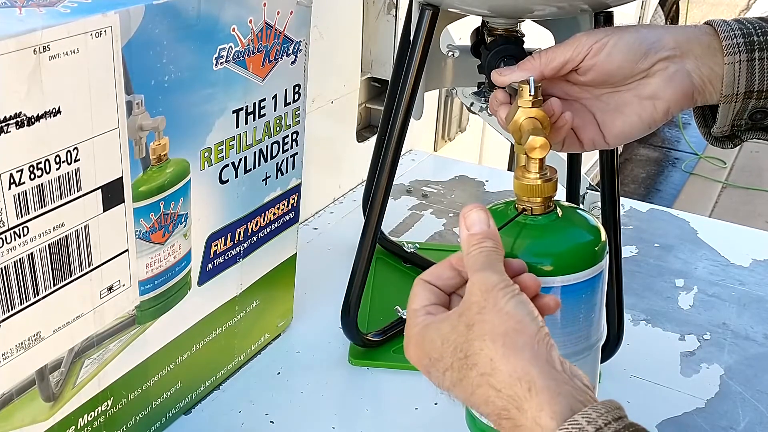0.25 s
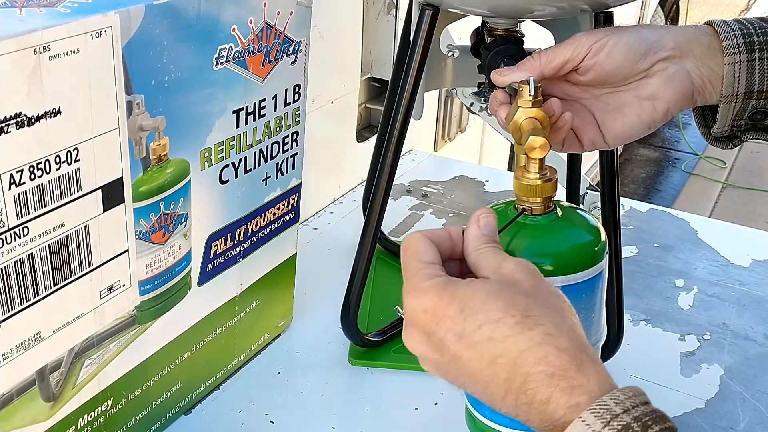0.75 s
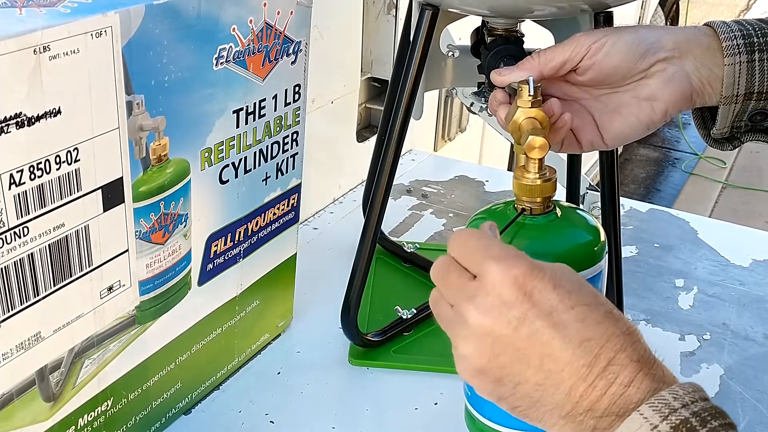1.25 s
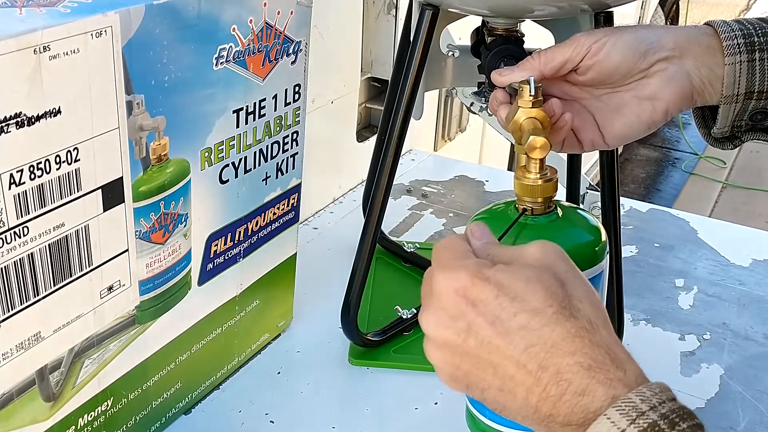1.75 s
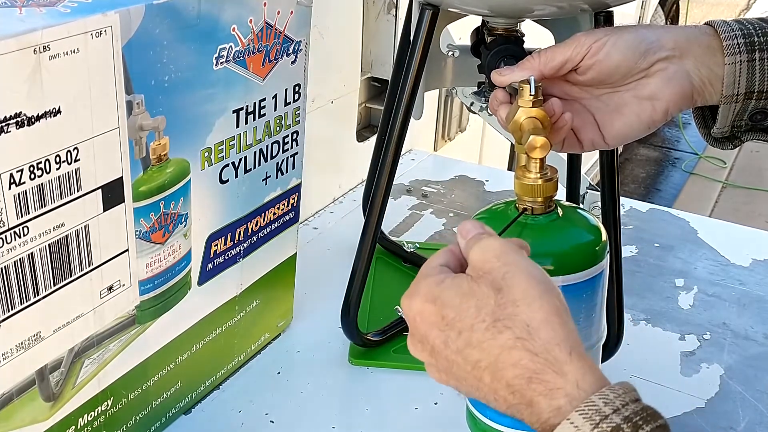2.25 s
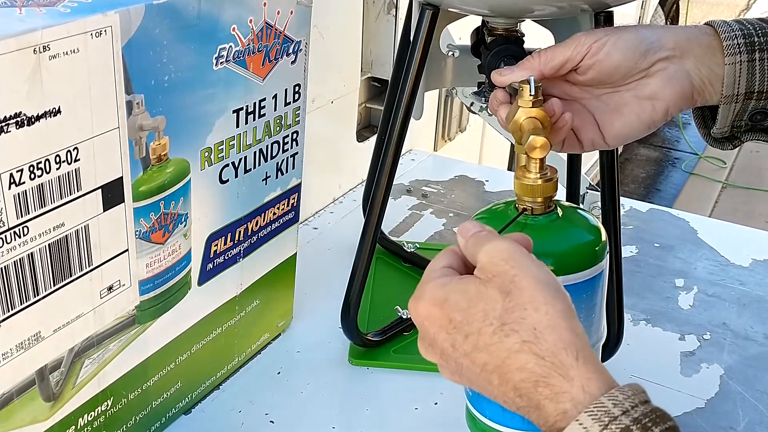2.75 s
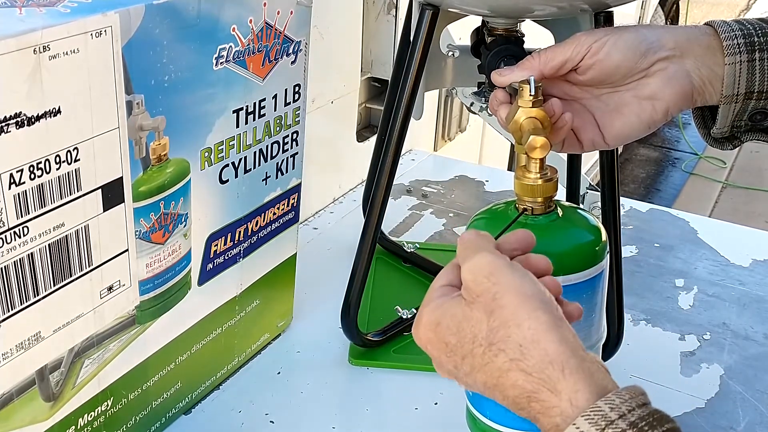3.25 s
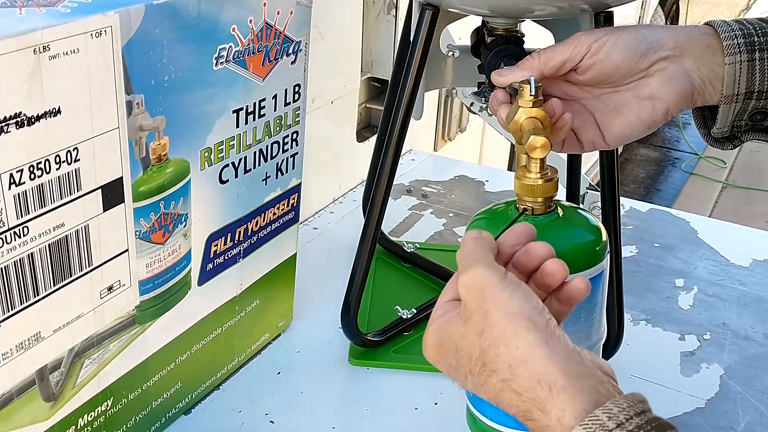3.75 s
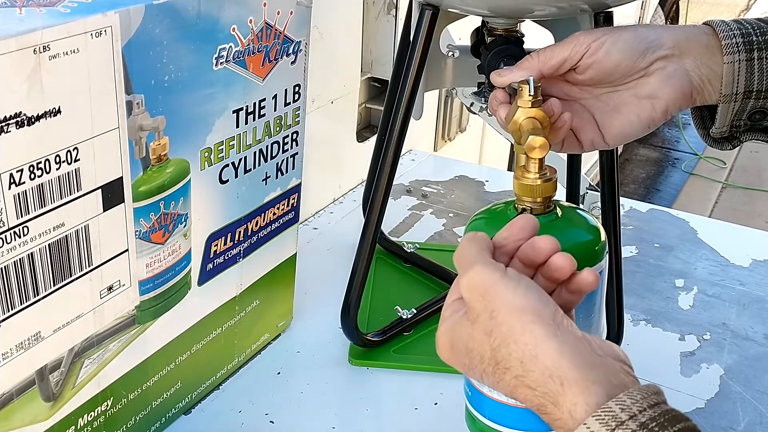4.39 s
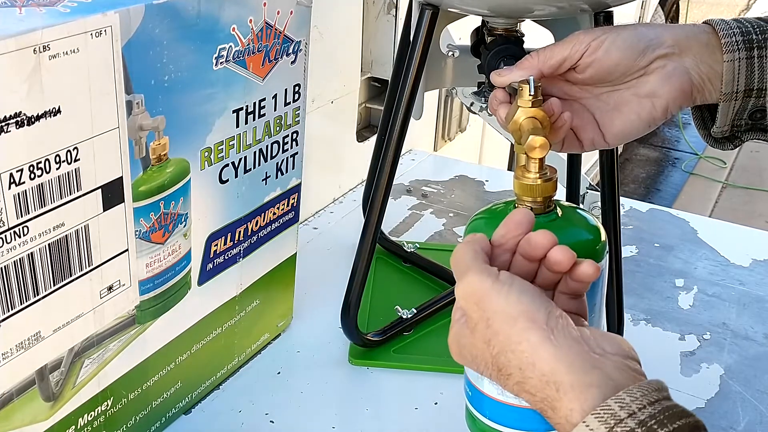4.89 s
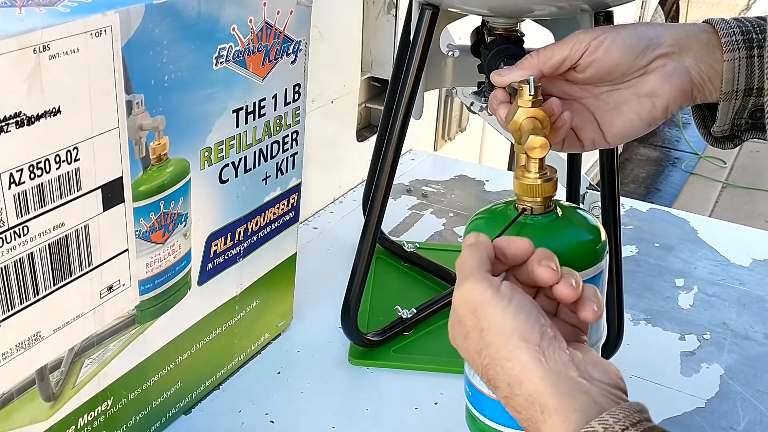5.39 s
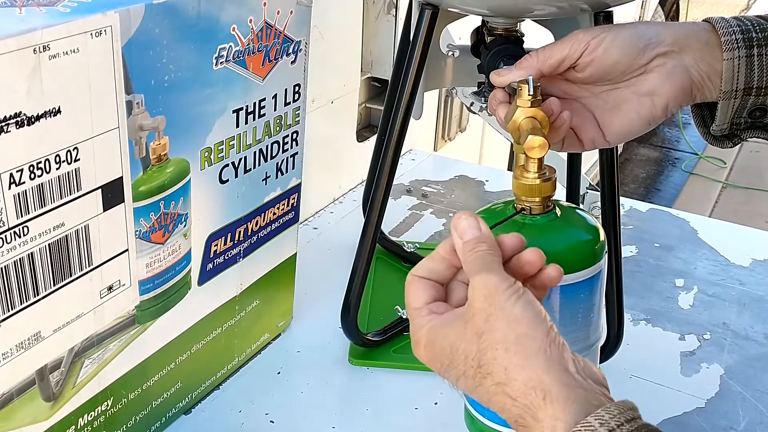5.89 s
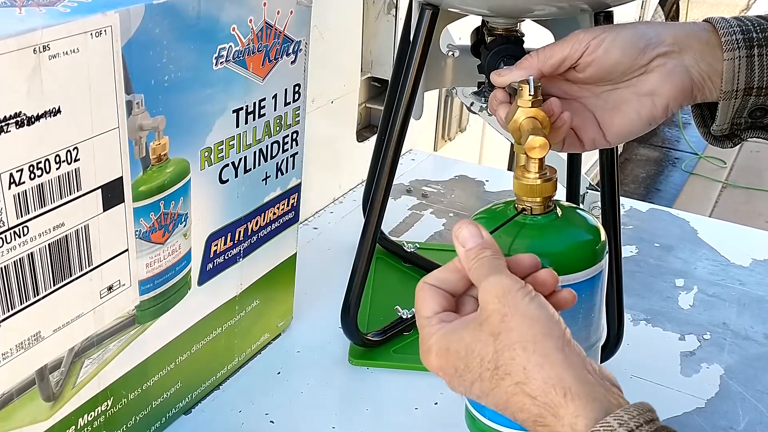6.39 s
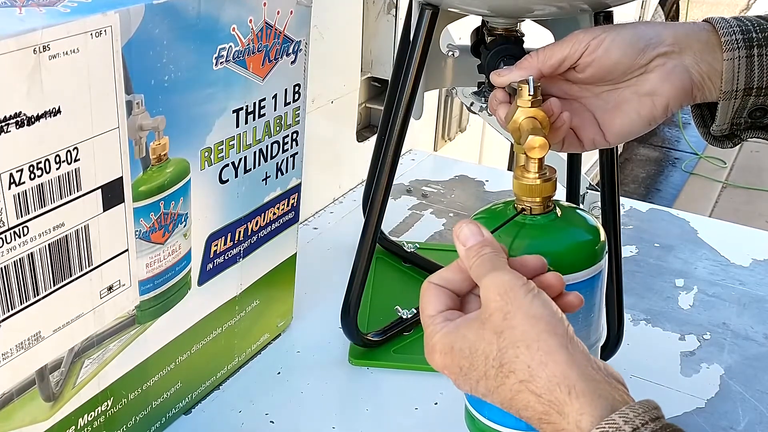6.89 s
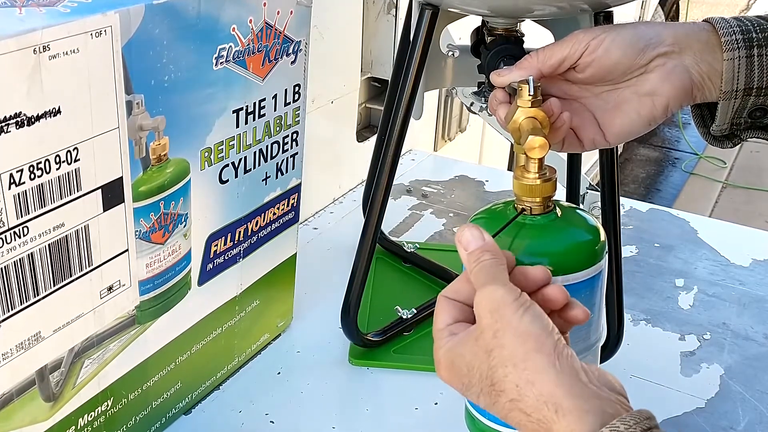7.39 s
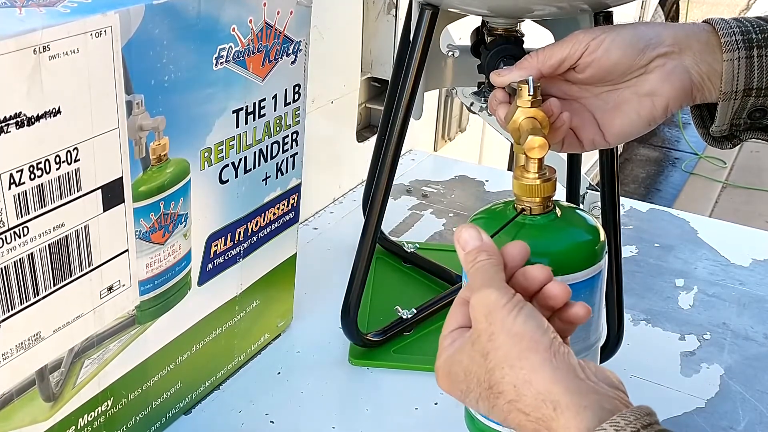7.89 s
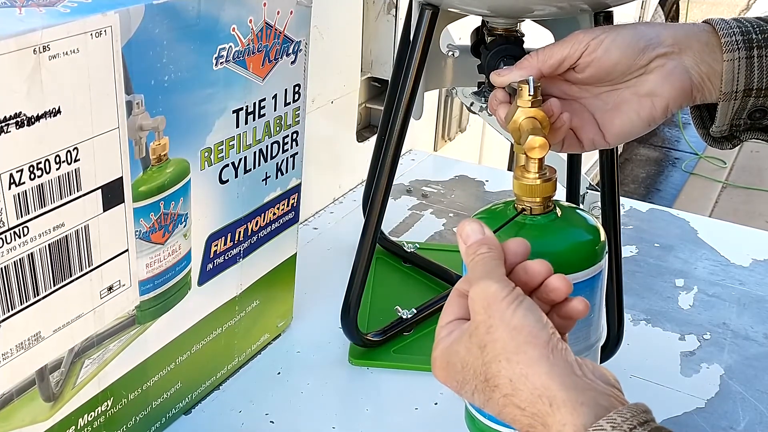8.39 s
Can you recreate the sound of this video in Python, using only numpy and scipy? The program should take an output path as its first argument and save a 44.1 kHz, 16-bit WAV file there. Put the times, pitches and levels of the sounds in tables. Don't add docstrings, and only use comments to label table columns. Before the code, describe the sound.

Gas jets sharply from a small bleed screw, dies away, returns by degrees from about two seconds, and hisses on steadily, sputtering briefly near the end.

```python
import sys
import numpy as np
from scipy import signal
from scipy.fft import rfft, irfft
from scipy.io import wavfile
from scipy.ndimage import uniform_filter1d

SR = 44100
rng = np.random.default_rng(int(sys.argv[2]) if len(sys.argv) > 2 else 0)


def makeup_ratio(level_db):
    decades = np.asarray(level_db, float) / 20
    return 10 ** decades


def materialize(psi):
    bounded = np.clip(np.atleast_2d(psi).T, -1, 1)
    quanta = np.round(bounded * 32767).astype(np.int16)
    wavfile.write(sys.argv[1], SR, quanta)


N = 381024
TIME_S = np.arange(N) / SR
HZ = np.fft.rfftfreq(N, 1 / SR) + 1e-3

# start_s, level_db
SCREW_FLOW = [(0, -20.5), (.53, -21), (.58, -22.5), (.628, -32.5), (.75, -42.5), (.776, -46.5), (.796, -90),
              (1.815, -88.5), (1.875, -57), (1.95, -48.5), (2.39, -28.5), (2.48, -26), (3.0, -26),
              (3.23, -23.5), (4.45, -20.5), (5.25, -21), (5.69, -19.5), (8.64, -20)]


def bleed():
    jet_db = along(SCREW_FLOW)
    surge_db = 1.7 * sum(gate for gate, _ in spit_gates())
    unsteady_db = 0.55 * walk(6) + 0.27 * walk(40) + surge_db
    hiss = makeup_ratio(jet_db) * (jet(jet_db) + whistle(jet_db))
    return makeup_ratio(unsteady_db) * (hiss + roar(jet_db) + boom(jet_db))


# freq_hz, density_db_per_hz
OPEN_JET = [(1760, -50), (3000, -26), (3590, -17), (3800, -11), (4500, -6), (5300, -6), (6200, -3),
            (7500, 0), (9000, .5), (10500, -3.5), (12000, -5.5), (13500, -4), (15650, -3), (17000, -3)]
# freq_hz, density_db_per_hz
PINCHED_JET = [(2000, -40), (3550, -26), (3900, -14), (4500, -15), (5500, -9), (6200, -5), (6950, 0),
               (7400, -4), (9000, -3), (11000, -6), (12200, -9), (13400, -5), (15400, -4), (17000, -4)]


def jet(jet_db):
    shut_db, open_db = -40, -22
    opened = np.clip((jet_db - shut_db) / (open_db - shut_db), 0, 1)
    wide = np.sqrt(opened) * heard(OPEN_JET, 0.14, 8.7, count=5)
    pinched = np.sqrt(1 - opened) * heard(PINCHED_JET, 0.89, 6.2, count=5)
    return wide + pinched


# freq_hz, density_db_per_hz
BORE_BAND = [(6300, -32), (6700, -8.5), (6950, 1.5), (7200, 0.5), (7500, -29)]


def whistle(jet_db):
    level_db, falter_at_db, falter_width_db, falter_depth_db = -11, -27, 3, 7
    filling_s, filling_db_per_s = 3.6, 3
    falter_db = falter_depth_db * np.exp(-((jet_db - falter_at_db) / falter_width_db) ** 2)
    fade_db = filling_db_per_s * np.maximum(TIME_S - filling_s, 0)
    return makeup_ratio(level_db - falter_db - fade_db) * heard(BORE_BAND, 1.2, 8, count=2, rings=[])


# freq_hz, density_db_per_hz
THROAT_COLOUR = [(710, -52), (1200, -17), (1920, -10), (2300, -10), (2810, -7), (3600, -6), (4000, 1.5),
                 (5200, -37.5), (8800, -120)]
# full_flow_db, slope_db_per_jet_db
ROAR_GROWTH = [
    (-40.5, 2.5),
    (-62, .38),
]


def roar(jet_db):
    return with_flow(jet_db, ROAR_GROWTH, full_db=-21.5) * heard(THROAT_COLOUR, 0.8, 6.9, count=3)


# full_flow_db, slope_db_per_jet_db
BOOM_GROWTH = [
    (-50.8, 4),
    (-76.5, .28),
]
# freq_hz, density_db_per_hz
STEEL_COLOUR = [(65, -44), (110, -3), (183, -11), (237, -2), (351, -9.5), (531, -1.5), (867, -9),
                (1020, -4.5), (1400, -12), (1820, -38), (3080, -120)]
BOOM_FULL_DB = -20.5


def boom(jet_db):
    return with_flow(jet_db, BOOM_GROWTH, BOOM_FULL_DB) * heard(STEEL_COLOUR, 0.81, 7.2, count=4)


# start_s, length_s, level_db
LIQUID_SPITS = [
    (7.588, .058, -29.5),
    (8.616, .05, -32),
]


def spit_gates():
    gates = []
    for start_s, length_s, level_db in LIQUID_SPITS:
        inside_s = np.minimum(TIME_S - start_s, start_s + length_s - TIME_S)
        gates.append((np.clip(inside_s / 0.003, 0, 1), level_db))
    return gates


# freq_hz, density_db_per_hz
SPIT_COLOUR = [(120, -28), (250, -6), (1000, -9), (3000, -4), (6000, 0), (10000, -5), (15700, -10)]


def spits():
    gate = sum(makeup_ratio(level_db) * gate for gate, level_db in spit_gates())
    return gate * makeup_ratio(2 * walk(150)) * heard(SPIT_COLOUR, 1.5, 60, count=3, rings=[])


# freq_hz, density_db_per_hz
VALVE_COLOUR = [(590, -29), (1000, -8.5), (1450, -10), (2240, -6.5), (3020, -13), (3800, -8), (5080, -13),
                (7260, -10), (9500, -13), (11000, -17), (15400, -17), (17000, -17)]


def fill_valve():
    start_s, rise_s, hold_s = 0.8, 0.15, 0.17
    level_db, boom_db, fade_db_per_s = -67.3, -7.6, 27.5
    since_s = TIME_S - start_s
    fade_db = fade_db_per_s * np.maximum(since_s - hold_s, 0)
    hiss = heard(VALVE_COLOUR, 0.8, 11, count=4)
    steel = makeup_ratio(boom_db) * heard(STEEL_COLOUR, 0.8, 8, count=3)
    return np.clip(1 + since_s / rise_s, 0, 1) * makeup_ratio(level_db - fade_db) * (hiss + steel)


# freq_hz, density_db_per_hz
TRAFFIC_COLOUR = [(18, -44), (30, -22), (45, -10), (62, 0), (80, -2), (120, -4), (145, -14), (330, -25),
                  (800, -28.5), (1500, -36), (3000, -42), (9300, -38), (13500, -48), (15500, -45)]


def yard():
    traffic_db, buffet_db, buffet_slope = -66.2, -62, 1.6
    hum_hz, hum_db = 698.5, -85.5
    hum = makeup_ratio(hum_db + 1.5 * walk(6)) * np.sqrt(2) * np.sin(2 * np.pi * hum_hz * TIME_S)
    buffet = with_flow(along(SCREW_FLOW), [(buffet_db, buffet_slope)], BOOM_FULL_DB)
    rumble = np.hypot(makeup_ratio(traffic_db), buffet)
    return rumble * heard(TRAFFIC_COLOUR, 1.5, 9.3, count=6, rings=[]) + hum


def with_flow(jet_db, parts, full_db):
    short_db = np.minimum(jet_db - full_db, 0)
    power = sum(makeup_ratio(db + slope * short_db) ** 2 for db, slope in parts)
    flowing = np.clip((jet_db + 78) / 16, 0, 1)
    return np.sqrt(power + 1e-18) * flowing


# freq_hz, width_hz, left_db, right_db
BODY_RINGS = [(242, 40, 4, 4), (330, 40, -4, -4), (800, 120, -2, -4), (1050, 120, 1, 3), (1950, 300, 4, 2),
              (2270, 200, -6, -5), (2850, 100, 2, 1), (3050, 120, 2, 2), (3220, 120, -4, -4),
              (3400, 130, 3, 3), (3600, 130, -4, -4), (4150, 500, -1.5, -2), (4430, 290, -4.5, -3),
              (5580, 130, -1.5, -1), (5850, 330, 3, 2.5), (6390, 140, 2, 1), (6530, 120, -2, 1.5),
              (7270, 300, 2, 2.5), (7590, 170, -2.5, 1.5), (8110, 130, -2, 1.5), (8820, 170, 2, 3),
              (9480, 320, -2, -1), (10080, 500, 3.5, -.5), (10890, 320, 2.5, -1), (11420, 310, -2.5, 0),
              (12190, 290, -3.5, -1), (13060, 430, 3.5, 1), (14580, 500, 1.5, 2), (15270, 180, 2, 0)]
# freq_hz, left_minus_right_db, alike_share (0-1)
CAMERA_PORTS = [(60, .5, .89), (200, .5, .92), (400, 0, .9), (650, 0, .78), (900, -1.5, .25),
                (1400, -.5, .45), (2000, 2, .55), (3000, 1, .5), (3750, .5, .5), (4500, 3.5, .42),
                (5300, -2, .2), (6200, -1.5, .3), (7500, -2, .5), (9000, -2.5, .6), (10500, -.5, .6),
                (12000, 7.5, .5), (13500, 4, .3), (14600, 2.5, .35), (15650, 2, .3)]
# left_delay_s, right_delay_s, level_db
NEAR_ECHOES = [
    (.0036, .0029, -20),
    (.0047, .0052, -21),
    (.0081, .0069, -21),
]


def heard(colour, flicker_db, flicker_hz, count, rings=BODY_RINGS):
    port_lag_s = 2.5e-5
    db = over_hz(colour) + np.array([[0.5], [-0.5]]) * over_hz(CAMERA_PORTS)
    for freq_hz, width_hz, *gain_db in rings:
        db = db + np.array(gain_db)[:, None] / (1 + (2 * (HZ - freq_hz) / width_hz) ** 2)
    paths = 1
    for left_s, right_s, level_db in NEAR_ECHOES:
        delay_s = np.array([[left_s], [right_s]])
        paths = paths + makeup_ratio(level_db) * np.exp(-2j * np.pi * HZ * delay_s)

    alike = np.clip(over_hz(CAMERA_PORTS, column=2), 0, 1)
    shared, *own = rfft(rng.standard_normal((3, N)))
    lag = np.exp(2j * np.pi * HZ * port_lag_s * np.array([[-0.5], [0.5]]))
    noise = np.sqrt(alike) * shared * lag + np.sqrt(1 - alike) * np.array(own)
    both = makeup_ratio(db) * paths * noise

    ends_hz = [colour[0][0], colour[-1][0]]
    place = np.interp(np.log(HZ), np.log(ends_hz), [0, count - 1])
    out = 0
    for k in range(count):
        band = irfft(both * np.clip(1 - abs(place - k), 0, 1), N)
        out = out + makeup_ratio(flicker_db * walk(flicker_hz)) * band
    return out / np.std(out.mean(axis=0))


def over_hz(table, column=1):
    rows = np.array(table)
    return np.interp(np.log(HZ), np.log(rows[:, 0]), rows[:, column])


def along(table):
    rows = np.array(table)
    return np.interp(TIME_S, rows[:, 0], rows[:, 1])


def walk(rate_hz):
    hold = int(SR / rate_hz)
    steps = np.repeat(rng.standard_normal(N // hold + 1), hold)
    return 0.89 * uniform_filter1d(uniform_filter1d(steps, hold), hold)[:N]


def scene():
    return bleed() + spits() + fill_valve() + yard()


def top_cut(x):
    return signal.sosfilt(signal.butter(12, 15730, fs=SR, output="sos"), x)


def record(dry):
    return top_cut(dry)


dry = scene()
out = record(dry)
materialize(out)
```